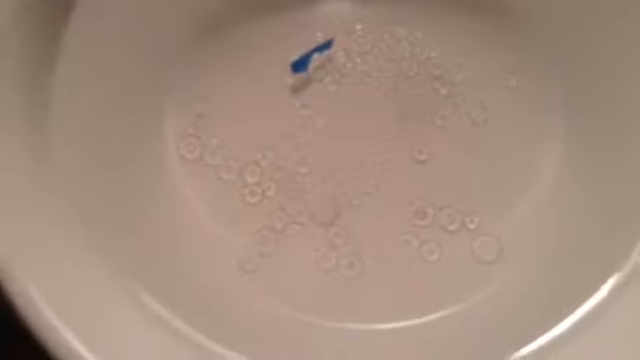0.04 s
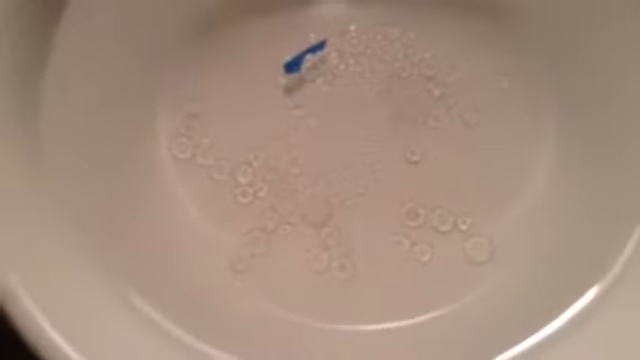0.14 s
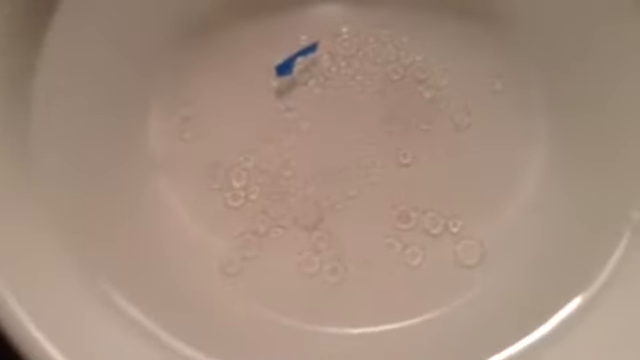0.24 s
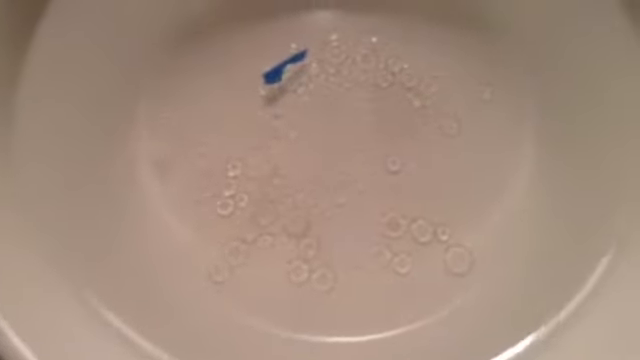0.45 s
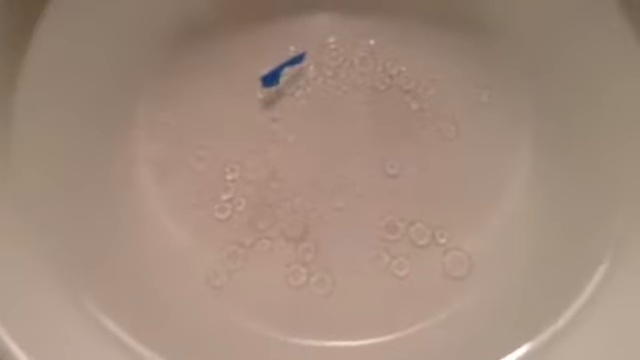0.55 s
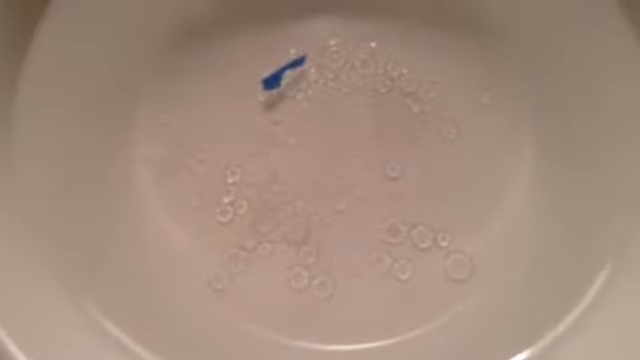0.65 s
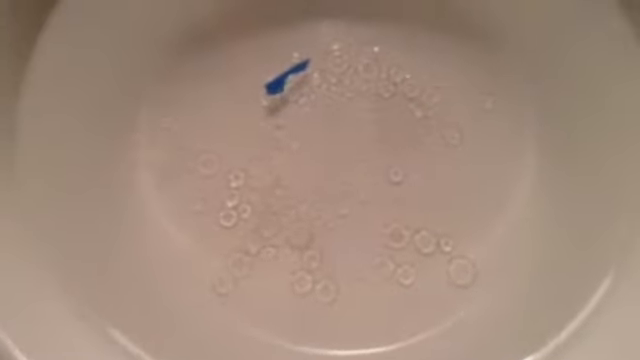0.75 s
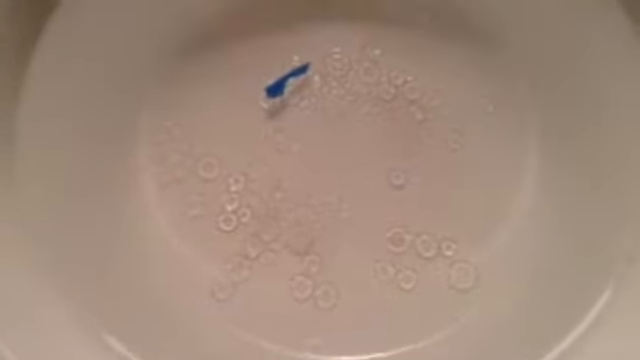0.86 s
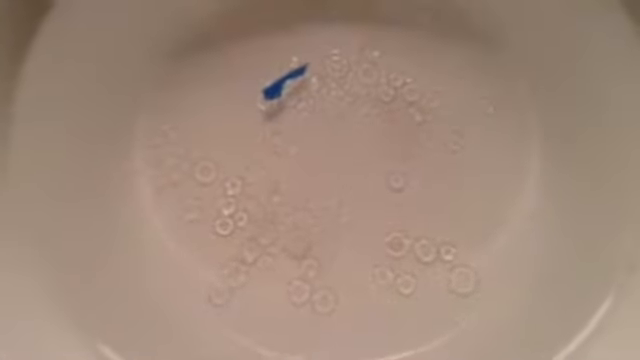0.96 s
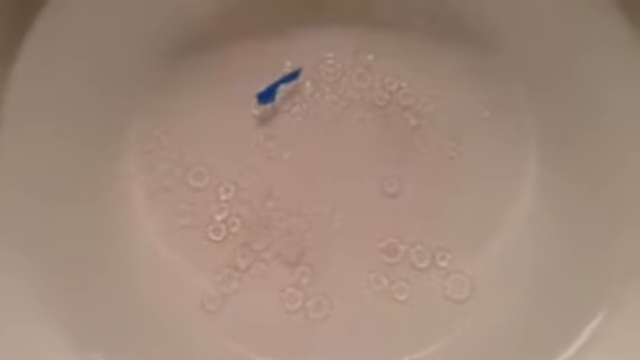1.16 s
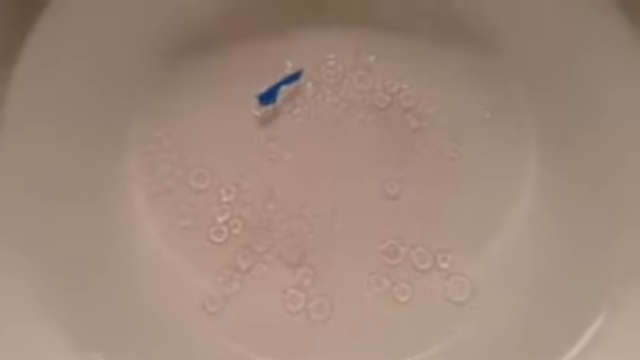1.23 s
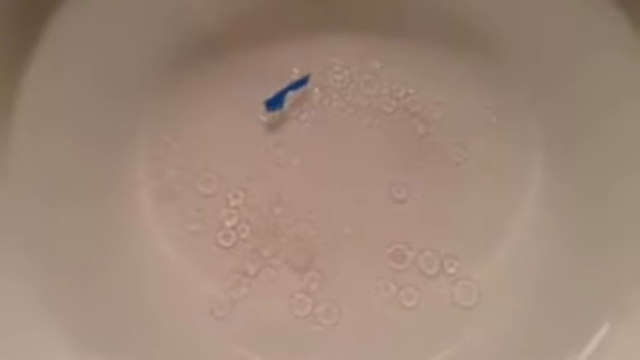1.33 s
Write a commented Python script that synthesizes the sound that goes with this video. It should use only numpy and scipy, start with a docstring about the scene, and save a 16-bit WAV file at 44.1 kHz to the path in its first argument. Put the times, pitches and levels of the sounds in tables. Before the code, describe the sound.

Heard up close in a small room, a bead splits in hot water with a bright snap against a ceramic bowl. Much quieter, irregular clicks and a barely audible fizz follow, over faint fan hum and hiss.

```python
"""Small beads crack in hot water in a ceramic bowl, close to the microphone, in a small room.
A fan hums and hisses faintly in the background throughout. About 0.2 s in, one bead splits with a
loud snap that rings the bowl. Finer cracks tick on until about 0.9 s, with a soft rustle behind
the last of them. A faint fizz swells and fades near 1 s, and a weaker, duller rustle follows."""
import sys
import numpy as np
from scipy import signal
from scipy.fft import rfft, irfft, next_fast_len
from scipy.io import wavfile
from scipy.ndimage import map_coordinates

SR = 44100
rng = np.random.default_rng(int(sys.argv[2]) if len(sys.argv) > 2 else 0)


def unload_wav(signal):
    """Save mono or channel-first audio to the path in sys.argv[1] as 16-bit WAV at rate SR, clipped to [-1, 1]."""
    wavfile.write(
        sys.argv[1],
        SR,
        np.round(np.clip(np.atleast_2d(signal).T, -1, 1) * 32767).astype(np.int16),
    )


N = 61739

# the bead that splits (time [s], level [dB])
BEAD_SPLITS = [(.2173, -2)]
# fine cracks (time [s], level [dB], relative level of the high ring [dB])
FINE_CRACKS = [(.3427, -51, 12), (0.3592, -37.5, -6), (0.381, -48.5, 12.5), (0.422, -40.5, -5),
               (0.4624, -47, -2), (.4998, -61.5, 13), (.5527, -59.5, 15), (.6773, -39.5, 7),
               (0.7492, -30.5, 7), (0.859, -27, 6), (.8720, -30, 1)]
# ringing modes (frequency [Hz], relative level [dB], t60 [s])
PING_MODES = [(8717, 0, 0.0057), (10500, 4, 0.0055), (11200, -13, 0.015), (12240, -20.5, 0.012),
              (14700, -12.5, 0.0061)]  # a crack in the water; fine cracks damp these further
BOWL_MODES = [(1452, -45, .13), (3435, -29, .078), (6075, -31, .055), (6110, -58, .5), (9240, -19, .02)]
KNOCK_MODES = [(175, -32.5, 0.026), (450, -40, 0.0059), (2305, -33, 0.014), (3984, -17, .006)]  # dull knock of the water against the bowl
# noise spectra (frequency [Hz], relative density [dB])
SPLIT_SPECTRUM = [(100, -12), (900, -32), (2000, -13), (4000, -5.5), (5200, -18.5), (8500, 4), (11000, 3),
                  (15000, -9.5)]
CRACK_SPECTRUM = [(100, -50), (4500, -53), (6500, -19), (8500, -3.5), (11000, 3), (13500, -15),
                  (15500, -9.5)]
TAIL_SPECTRUM = [(200, -25), (1200, -27), (2000, -19.5), (2600, -2.5), (2950, -18), (3450, -9),
                 (4000, -15.5), (5700, -14), (6100, -10), (6500, -17), (8400, 3), (9400, 1.5), (11000, -3),
                 (12500, -3), (13100, -5), (13700, -14), (15500, -19.5)]
RUSTLE_BODY_SPECTRUM = [(500, -19), (1000, -7), (1200, 3.5), (1600, -1.5), (2500, 2.5), (3300, -9.5),
                        (5000, -20), (9000, -18)]
RUSTLE_TREBLE_SPECTRUM = [(3000, -25), (6500, -11), (7500, 1.5), (8400, 5.5), (9200, -3), (11000, -11.5),
                          (13000, -11), (15500, -20)]
FIZZ_SPECTRUM = [(800, -26), (2300, -2), (3500, -7), (5500, -2.5), (7200, 3.5), (9500, -2.5), (12000, -13),
                 (15000, -20)]
AIR_SPECTRUM = [(30, -26), (75, -20), (105, -13.5), (150, -6), (200, 1.5), (300, -2), (500, -6), (750, -11),
                (1100, -17), (2000, -26), (5000, -47.5)]
HISS_SPECTRUM = [(500, -13), (1500, -1), (2250, 2.5), (2650, 8.5), (3100, -2), (4800, -4), (8300, 0.5),
                 (11500, -2.5), (13200, -3.5), (15300, -5.5)]
# echoes off near surfaces (delay [s], level [dB])
EARLY_ECHOES = [(.0042, -19), (.0099, -24), (0.0169, -31.5), (0.0196, -26)]
# decay of the room's tail (frequency [Hz], t60 [s])
TAIL_T60 = [(200, .3), (2500, .48), (6000, 0.6), (9000, .38), (14000, 0.43)]
# rustles (peak time [s], level [dB], relative treble [dB], rise [s], base t60 [s])
SOFT_RUSTLES = [(.672, -56.5, 2.5, .02, 0.4), (1.273, -63.5, -8, 0.0076, .25)]
# how long each band of a rustle lingers (frequency [Hz], t60 factor [ratio])
RUSTLE_LINGER = [(1200, 2.2), (2500, 0.66), (5000, .8), (8300, 0.91), (13000, 1.1)]
# motor tones of the fan (frequency [Hz], relative level [dB])
FAN_TONES = [(102.3, -71), (118.4, -70), (177.6, -69), (236.9, -72), (296.1, -70.5), (360.7, -70.5),
             (409.1, -72), (473.7, -78), (511.4, -71), (597.5, -78.5), (651.4, -74.5)]


def bead_split(noise_db=-6, noise_t60_s=.008):
    """Close up, a bead bursts: fracture noise, a ping, a knock through the water and the bowl's ring."""
    out = np.zeros(N)
    for start, db in BEAD_SPLITS:
        t = since(start)
        fracture = amp(noise_db) * noise(SPLIT_SPECTRUM) * fade(t, noise_t60_s, attack_s=.0001)
        bowl = ring(t, BOWL_MODES + KNOCK_MODES, attack_s=.0001)
        out += amp(db) * (fracture + ping(t, high_db=0) + bowl)
    return out


def fine_cracks(noise_db=-2.5, noise_t60_s=.013, ping_db=-.5, detune=.0042, damping_db_per_s=1500):
    """Cracks too weak to ring the bowl; their pings die faster and vary a little in pitch."""
    out = np.zeros(N)
    for start, db, high_db in FINE_CRACKS:
        t = since(start)
        fracture = amp(noise_db) * noise(CRACK_SPECTRUM) * fade(t, noise_t60_s, attack_s=.00016)
        pitch_ratio = 1 + detune * rng.standard_normal()
        tone = ping(t * pitch_ratio, high_db) * amp(ping_db - damping_db_per_s * t)
        out += amp(db) * (fracture + tone)
    return out


def ping(t, high_db, high_hz=13000, high_t60_s=.0115):
    """Every crack rings briefly in the water, with one high ring whose strength varies."""
    high_ring = ring(t, [(high_hz, high_db, high_t60_s)], attack_s=.00043)
    return ring(t, PING_MODES, attack_s=.00034) + high_ring


def room(cracks, tail_db=-38, fine_offset_db=-.5):
    """Near surfaces of the small room answer first; then every crack leaves a diffuse tail."""
    early = sum(amp(db) * np.pad(cracks, (int(delay * SR), 0))[:N] for delay, db in EARLY_ECHOES)
    events = BEAD_SPLITS + [(start, db + fine_offset_db) for start, db, _ in FINE_CRACKS]

    def tails(t, hz):
        t60 = along(TAIL_T60, hz)
        power = sum((amp(db) * fade(np.maximum(t - start, 0), t60, attack_s=.002)) ** 2
                    for start, db in events)
        return np.sqrt(power)

    return early + amp(tail_db) * shaped_noise(TAIL_SPECTRUM, tails)


def rustles():
    """Behind the cracks, soft rustles swell and die away, the low middle last."""
    out = np.zeros(N)
    for peak, db, treble_db, rise, base_t60 in SOFT_RUSTLES:
        def swell(t, hz):
            t60 = base_t60 * along(RUSTLE_LINGER, hz)
            growth = 2 * np.minimum(t - peak, 0) / rise
            decay = np.log(1000) * np.maximum(t - peak, 0) / t60
            return np.exp(growth - decay)

        body = shaped_noise(RUSTLE_BODY_SPECTRUM, swell)
        treble = amp(treble_db) * shaped_noise(RUSTLE_TREBLE_SPECTRUM, swell)
        out += amp(db) * (body + treble)
    return out


def fizz(peak_s=.98, width_s=.041, level_db=-65.5):
    """A soft hiss swells and fades after the last cracks."""
    swell = np.exp(-((since(0) - peak_s) / width_s) ** 2)
    return amp(level_db) * noise(FIZZ_SPECTRUM) * swell


def fan(hum_db=-.5, air_db=-60.5, hiss_db=-66.5, waver_db=3, drift_rad=.46):
    """In the background, a fan's motor tones waver over moving air and hiss."""
    t = since(0)
    hum = np.zeros(N)
    for hz, db in FAN_TONES:
        rms = amp(db + waver_db * wobble(knots_per_s=6.97))
        phase = 2 * np.pi * (hz * t + rng.random()) + drift_rad * wobble(knots_per_s=5.5)
        hum += np.sqrt(2) * rms * np.sin(phase)
    return amp(hum_db) * hum + amp(air_db) * noise(AIR_SPECTRUM) + amp(hiss_db) * noise(HISS_SPECTRUM)


def amp(db):
    """Decibels to gain."""
    return 10 ** (np.asarray(db) / 20)


def since(start):
    """Seconds since start, zero before it."""
    return np.maximum(np.arange(N) / SR - start, 0)


def fade(t, t60, attack_s):
    """A quick rise and an exponential decay."""
    return np.exp(-np.log(1000) * t / t60) * (1 - np.exp(-t / attack_s))


def ring(t, modes, attack_s):
    """Damped sines that start together."""
    return sum(amp(db) * fade(t, t60, attack_s) * np.sin(2 * np.pi * hz * t) for hz, db, t60 in modes)


def wobble(knots_per_s):
    """A smooth random curve."""
    return map_coordinates(rng.standard_normal(256), [np.arange(N) * knots_per_s / SR], mode="mirror")


def along(points, hz):
    """Interpolate (frequency [Hz], value) points on a log frequency axis."""
    frequencies, values = np.transpose(points)
    return np.interp(np.log(hz + 1), np.log(frequencies + 1), values)


def filtered(x, response):
    """Filter x by the gain response(hz)."""
    size = next_fast_len(N + SR // 2)
    return irfft(rfft(x, size) * response(np.fft.rfftfreq(size, 1 / SR)), size)[:N]


def noise(spectrum):
    """Coloured noise of rms 1."""
    x = filtered(rng.standard_normal(N), lambda hz: amp(along(spectrum, hz)))
    return x / np.sqrt(np.mean(x ** 2) + 1e-20)


def shaped_noise(spectrum, envelope):
    """Coloured noise under envelope(t, hz), so that each band dies at its own speed."""
    hz, t, bands = signal.stft(noise(spectrum), SR, nperseg=128)
    return signal.istft(bands * envelope(t, hz[:, None]), SR, nperseg=128)[1][:N]


def scene():
    """In mono: the bowl close to the microphone, the room around it, the background behind."""
    cracks = bead_split() + fine_cracks()
    return (cracks + room(cracks) + rustles() + fizz() + fan())[None]


def record(dry, ceiling=.85, top_hz=15350):
    """The microphone rounds off the loudest peak and cuts steeply above its band limit."""
    rounded = dry[0] / (1 + (dry[0] / ceiling) ** 4) ** (1 / 4)
    return filtered(rounded, lambda hz: 1 / np.sqrt(1 + (hz / top_hz) ** 160))[None]


dry = scene()
out = record(dry)
unload_wav(out)
```